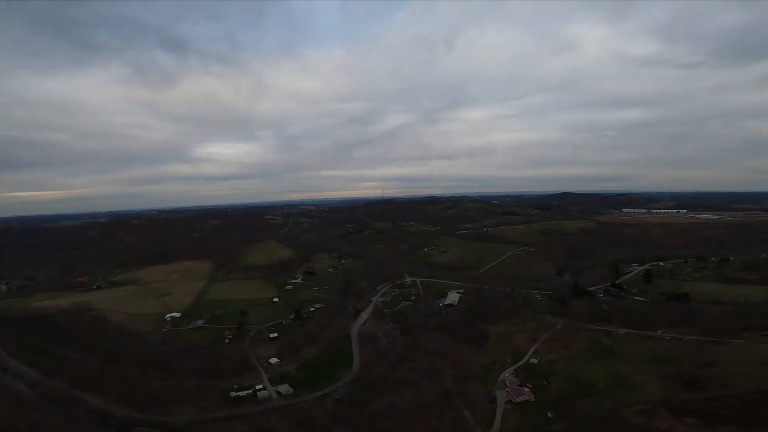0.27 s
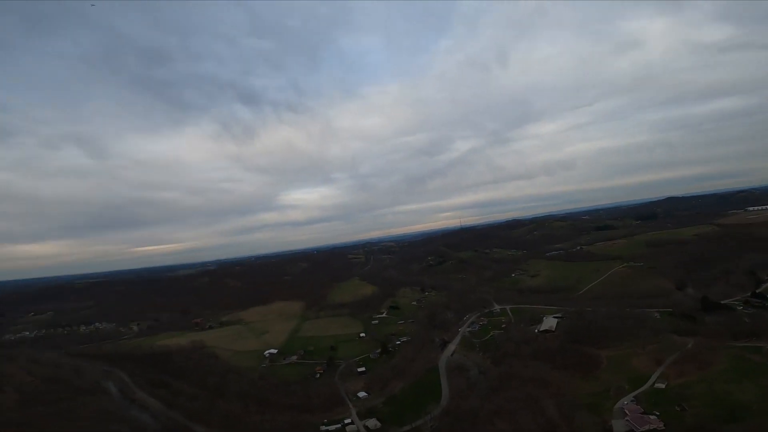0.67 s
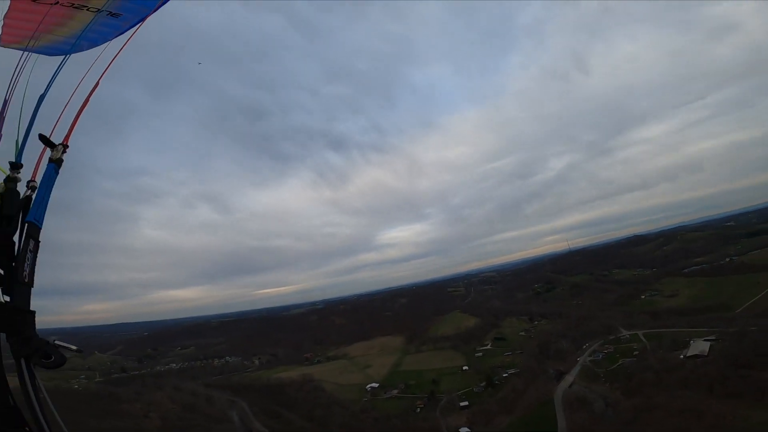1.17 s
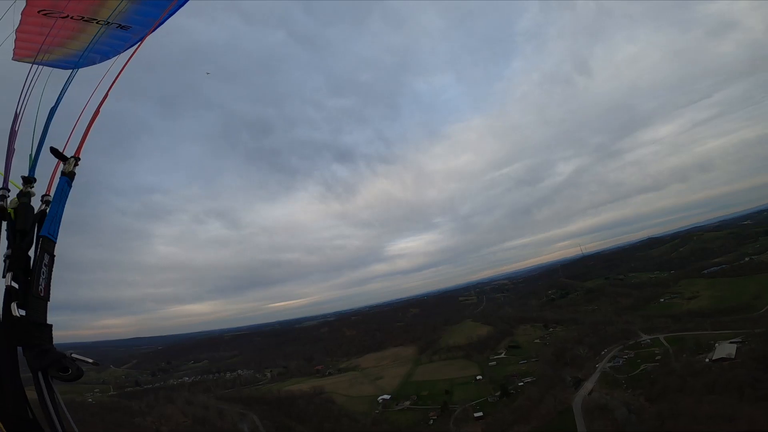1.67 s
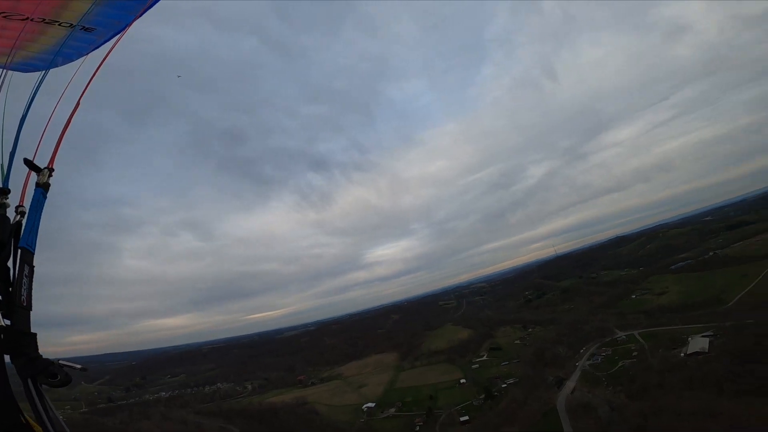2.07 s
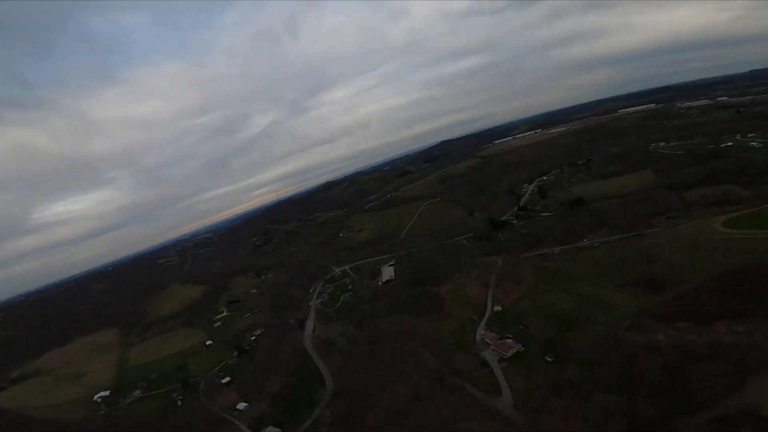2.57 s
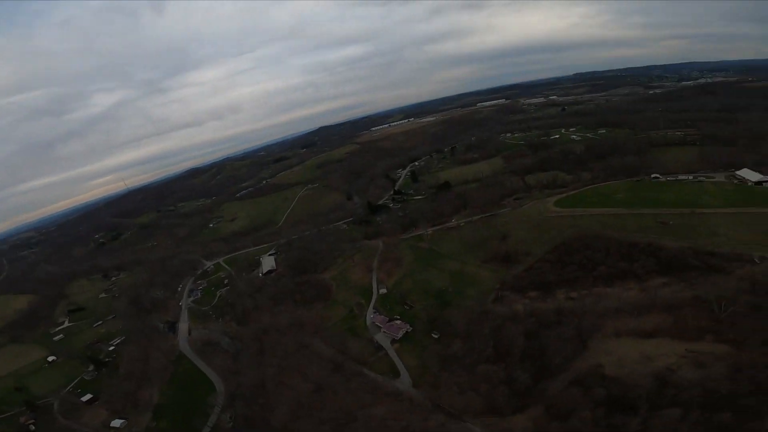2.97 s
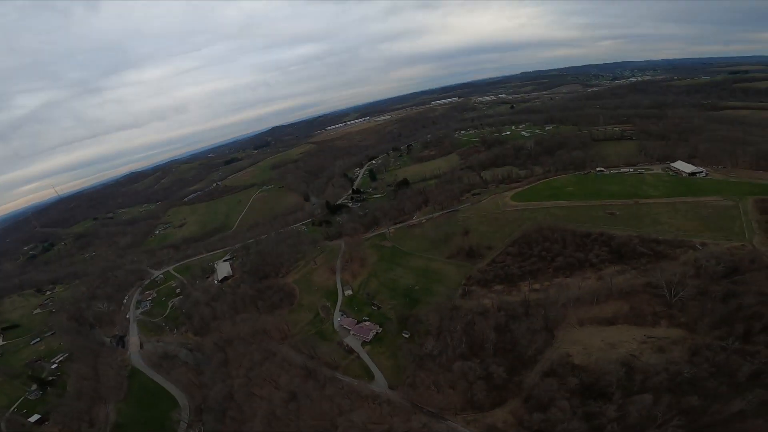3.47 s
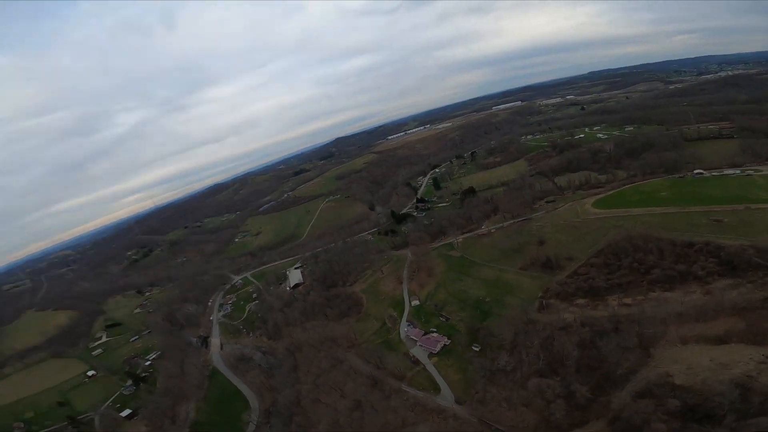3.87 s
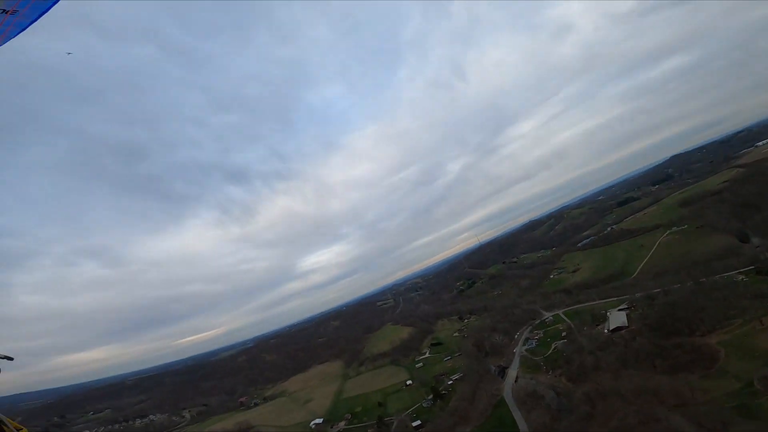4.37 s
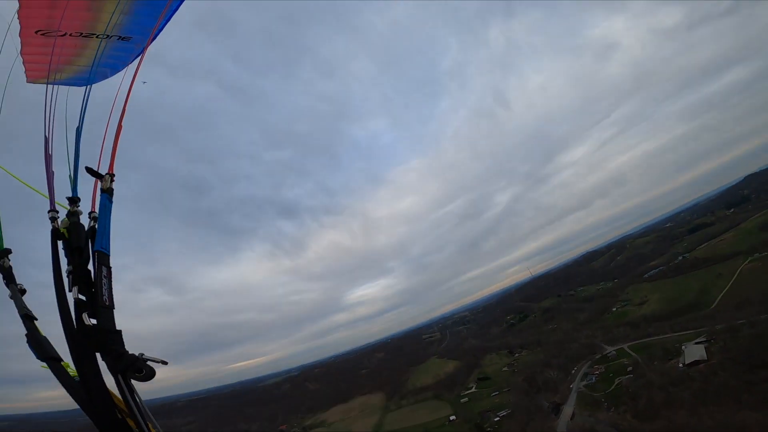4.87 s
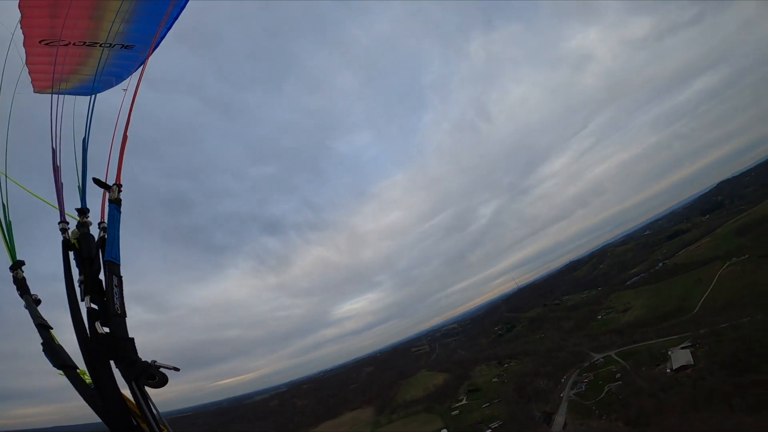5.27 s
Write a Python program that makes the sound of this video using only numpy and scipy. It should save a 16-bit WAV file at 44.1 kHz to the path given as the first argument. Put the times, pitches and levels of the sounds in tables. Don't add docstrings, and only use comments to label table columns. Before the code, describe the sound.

Heard close at a flying pilot's helmet, a small engine and propeller drone evenly while pulsing wind roar and bright blade swish come and go.

```python
import sys
import numpy as np
from scipy import signal
from scipy.fft import rfft, irfft, next_fast_len
from scipy.io import wavfile
from scipy.ndimage import uniform_filter1d

SR = 44100
rng = np.random.default_rng(int(sys.argv[2]) if len(sys.argv) > 2 else 0)


def dump_mix(stems):
    frames = np.atleast_2d(stems).T
    limited = np.clip(frames, -1, 1)
    pcm = np.round(limited * 32767).astype(np.int16)
    wavfile.write(sys.argv[1], SR, pcm)


def boost_factor(decibels):
    exponent = np.asarray(decibels, float) / 20
    return 10 ** exponent


N = 243431


def rms_one(x):
    return x / np.sqrt(np.mean(x ** 2) + 1e-20)


def in_time(rows):
    s, *columns = np.transpose(rows)
    return [np.interp(np.arange(N) / SR, s, column) for column in columns]


def swells(rows):
    time = np.arange(N) / SR
    return sum(db * np.exp(-((time - s) / width) ** 2) for s, db, width in rows)


def drift(rate):
    pole = np.exp(-80 * np.pi * rate / SR)
    steps = rng.standard_normal(N // 40 + 2002)
    slow = signal.lfilter([1], [1, -2 * pole, pole * pole], steps)[2000:]
    return np.interp(np.arange(N) / 40, np.arange(len(slow)), rms_one(slow - slow.mean()))


# (time [s], blade disc in view [0-1], ear toward the exhaust [0-1])
HEAD = [(0, .3, 0), (.5, .38, .15), (.66, .58, .3), (.94, .66, .5), (1.01, 1.05, .53), (1.4, .9, .27),
        (2.28, .86, .33), (2.48, .06, .05), (2.82, .03, .1), (3.05, .03, .45), (3.5, .25, .65),
        (3.66, .27, 1), (4.24, .4, .88), (4.32, .42, .57), (4.54, .83, .36), (4.68, .9, .05),
        (5.52, 1, .33)]


def heard(level_db, view_db, exhaust_db, bend=0.82):
    view, side = in_time(HEAD)
    return level_db + view_db * view + exhaust_db * side ** bend


# (time [s], turn [0-1])
TURN = [
    (0, 1),
    (.9, 0.95),
    (1.0, 0.72),
    (2.25, 0.92),
    (2.45, 0.27),
    (4.2, 0),
    (4.32, 1),
    (4.55, 0.98),
    (5.52, 0.7),
]


def head_turn():
    return np.clip(in_time(TURN)[0], 0, 1)


# (time [s], firing rate [1/s])
SPEED = [(0.0, 94.69), (0.34, 94.47), (0.69, 94.2), (1.03, 93.88), (1.38, 93.67), (1.72, 93.71),
         (2.07, 93.91), (2.41, 94.02), (2.76, 94.03), (3.1, 94.08), (3.45, 94.11), (3.79, 94.06),
         (4.14, 93.95), (4.48, 93.8), (4.83, 93.73), (5.17, 93.81), (5.52, 93.93)]


def crank_angle():
    return 2 * np.pi * np.cumsum(in_time(SPEED)[0]) / SR


def colour(x, spectrum):
    size = next_fast_len(N)
    hz, db = np.transpose(spectrum)
    bins = np.arange(1, size // 2 + 2) * SR / size
    shape_db = np.interp(np.log(bins), np.log(hz), db)
    shape_db = shape_db - 70 * np.log2(np.maximum(bins / hz[-1], 1))
    return rms_one(irfft(rfft(x, size) * boost_factor(shape_db), size)[:N])


def eddies(chop_db, patchy_db, low, high):
    out = 0
    together = drift(15)
    white = rng.standard_normal((2, N))
    for k, edge in enumerate(20 * 2. ** np.arange(low, high)):
        band = signal.butter(2, [edge, min(2 * edge, .45 * SR)], "band", fs=SR, output="sos")
        flicker_db = patchy_db * (.5 * together + drift(35))
        out = out + signal.sosfilt(band, white[k % 2]) * boost_factor(chop_db + flicker_db)
    return out


def chop(angle, depth_db, lag, uneven):
    passes = ((angle - lag + np.pi) // (2 * np.pi)).astype(int) + 2
    strength = 1 + uneven * rng.standard_normal(2000)[passes]
    return depth_db * strength * (.5 + .5 * np.cos(angle - lag)) ** 1.6


def gusts(blade, struts, uneven):
    out = 0
    for angle, db, decay in struts:
        passes, since = np.divmod(blade - angle + 4 * np.pi, 2 * np.pi)
        strength = 1 + uneven * rng.standard_normal(2000)[passes.astype(int)]
        out = out + db * strength * np.exp(-since / decay)
    out = uniform_filter1d(out, size=70)
    return out - out.mean()


# (blade angle [rad], level [dB], decay [rad])
GUSTS_AHEAD = [
    (1.6, 3, .5),
    (3.1, 6, 2.6),
]
GUSTS_TURNED = [
    (.5, 6, 1.9),
    (2.7, 3.5, .7),
]


def blade_wake(blade, turn):
    ahead_db = gusts(blade, GUSTS_AHEAD, uneven=.16)
    turned_db = gusts(blade, GUSTS_TURNED, uneven=.14)
    return ahead_db + turn * (turned_db - ahead_db)


# (frequency [Hz], level [dB per Hz])
BUFFET = [(15, -14.5), (40, -4), (75, -2), (130, -0.5), (220, -1), (330, -0.5), (500, -7), (750, -12),
          (1200, -46)]


def buffet(wake_db):
    noise = colour(eddies(0.54 * wake_db, 0.36, low=0, high=4.6), BUFFET)
    return boost_factor(heard(-22, 1.64, 0.1)) * noise


# (frequency [Hz], level [dB per Hz])
ROAR = [(300, -10), (600, 0), (850, -1.5), (1400, -5), (1900, -14), (2400, -22.5), (3000, -22.5),
        (3600, -28), (4000, -33), (4700, -39), (6000, -45), (7000, -52), (8800, -48), (10000, -49.5)]


def roar(wake_db, puffs_db):
    noise = colour(eddies(1.55 * wake_db + .2 * puffs_db, .7, low=3, high=10), ROAR)
    return boost_factor(heard(-29.5, 2.96, 4.84)) * noise


# (frequency [Hz], level [dB per Hz])
SWISH = [(450, -24.5), (900, -5.5), (1500, -7), (2200, -10.5), (2950, -13), (3450, -18.5), (3950, -14),
         (4400, -18.5), (4800, -24), (5600, -26.5), (6050, -27), (6600, -32), (8000, -36.5), (9500, -52)]


def swish(wake_db, puffs_db, turn):
    chop_db = (.7 + 1.15 * turn) * wake_db + 1.3 * puffs_db
    noise = colour(eddies(chop_db, .8, low=4, high=10), SWISH)
    return boost_factor(heard(-42, 14.5, 0.1)) * noise


def air(blade, crank, turn):
    wake_db = blade_wake(blade, turn)
    puffs_db = chop(crank, 1.6, -3.0, uneven=.3)
    return buffet(wake_db) + roar(wake_db, puffs_db) + swish(wake_db, puffs_db, turn)


# (centre frequency [Hz], half width [Hz])
WHISTLE_BANDS = [
    (11500, 1050),
    (13400, 1200),
    (8650, 600),
]
# (time [s], level [dB], half width [s])
TOP_FLARE = [
    (4.0, 4, .3),
    (4.2, 10, .08),
    (4.4, 8, .1),
]


def tip_whistle(blade, turn):
    level_db = heard(-72.5, -1, 12.5)
    top_db = heard(-99, 3, 31, bend=1.8) + swells(TOP_FLARE)
    both_blades_db = chop(blade, 4, .4 + 2.4 * turn, uneven=.35)
    one_blade_db = chop(blade / 2, 2 + 3.5 * turn, 3.3 - 1.9 * turn, uneven=.4)
    pass_gain = boost_factor(both_blades_db + one_blade_db)
    out = 0
    for (hz, half_hz), db in zip(WHISTLE_BANDS, (level_db, top_db, level_db - 3.5 - 15 * turn)):
        band = signal.butter(3, [hz - half_hz, hz + half_hz], "band", fs=SR, output="sos")
        hiss = signal.sosfilt(band, rng.standard_normal(N))
        out = out + boost_factor(db) * rms_one(hiss * pass_gain)
    return out


# (time [s], level [dB], half width [s])
GEAR_IN_LINE = [
    (.38, 9, .3),
    (3.25, 11, .35),
    (3.8, 12, .4),
]


def gear_whine(crank):
    level_db = heard(-64, 10, 2.3) + swells(GEAR_IN_LINE) + 1.8 * drift(15)
    mesh = np.cos(30 * crank + .45 * drift(12))
    return np.sqrt(2) * boost_factor(level_db) * mesh * (1 + .3 * np.cos(crank))


def overtones(angle, orders, turn, lead, wander_db, wobble):
    out = 0
    for k, ahead_db, turned_db in orders:
        level_db = ahead_db + turn * (turned_db - ahead_db) + wander_db * drift(4.15)
        phase = k * angle + lead(k) + wobble * np.sqrt(k) * drift(4.6)
        out = out + np.sqrt(2) * boost_factor(level_db) * np.cos(phase)
    return out


# (order of the firing rate, level facing ahead [dB], level turned [dB])
EXHAUST_ORDERS = [(2, -8, -8), (3, -2.5, -3.5), (4, -10, -7), (5, -15, -7), (6, -15.5, -14.5),
                  (7, -14, -21), (8, -25.5, -16), (9, -21, -18.5), (10, -23, -21.5)]


def exhaust(crank, turn):
    def pipe_lead(k):
        return 1 + 1.3 * k + .1 * k * k

    firing = np.sqrt(2) * boost_factor(heard(-21, -5, 3.9) + 1.35 * drift(3.6)) * np.cos(crank + 2.82)
    upper = overtones(crank, EXHAUST_ORDERS, turn, pipe_lead, wander_db=1.3, wobble=.08)
    return firing + boost_factor(heard(-25.5, -4, 7.5)) * upper


# (order of the blade rate, level facing ahead [dB], level turned [dB])
BLADE_ORDERS = [(4, -9, -12), (5, -6, -5), (6, -8, -6), (8, -16, -16), (9, -14, -19), (11, -10, -17),
                (12, -28, -16), (13, -23, -18), (14, -26, -22), (16, -21, -26), (17, -23, -26)]
# (order of the blade rate, level [dB], gain in view [dB], gain toward the exhaust [dB])
NEAR_ORDERS = [(2, -36, 2, 8), (3, -38.5, 4.5, -6), (7, -27, -9.5, 0.7), (10, -41, -1.2, 2)]
# (time [s], level [dB], half width [s])
SWINGS = [
    (.1, 5.5, 0.39),
    (2.5, 10, 0.4),
    (4.25, 19, 0.38),
]


def propeller(blade, turn):
    near = 1.9 * np.minimum(turn, .8)

    def helmet_lead(k):
        resonance = 3.5 / (1 + (3.2 / k) ** 5)
        return 1.4 * k + resonance + (1.25 * near - 2.1) * (k < 3)

    thump_db = heard(-24.5, 5.6, 0.1) + 0.65 * drift(10.0)
    thump = np.sqrt(2) * boost_factor(thump_db) * np.cos(blade + 0.75 + near)

    over_db = heard(-17.5, -2.7, 0.1) - 3 * turn
    upper = overtones(blade, BLADE_ORDERS, turn, helmet_lead, wander_db=1.3, wobble=.07)

    extra_db = {3: swells(SWINGS), 10: 13.5 * turn}
    swelling = []
    for k, level_db, view_db, exhaust_db in NEAR_ORDERS:
        db = heard(level_db, view_db, exhaust_db) + extra_db.get(k, 0)
        swelling.append((k, db, db))
    moving = overtones(blade, swelling, turn, helmet_lead, wander_db=1, wobble=.08)
    return thump + boost_factor(over_db) * upper + moving


def scene():
    crank = crank_angle()
    blade = crank / 1.8963
    turn = head_turn()
    background = air(blade, crank, turn) + tip_whistle(blade, turn)
    engine = gear_whine(crank) + exhaust(crank, turn)
    return (background + engine + propeller(blade, turn))[None]


def roll_off(x):
    return signal.sosfilt(signal.butter(12, 15600, fs=SR, output="sos"), x)


def record(dry):
    mix = 0.87 * np.tanh(dry / 0.88)
    return roll_off(mix)


dry = scene()
out = record(dry)
dump_mix(out)
```